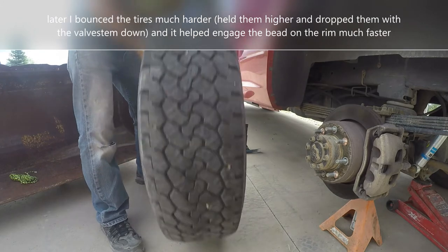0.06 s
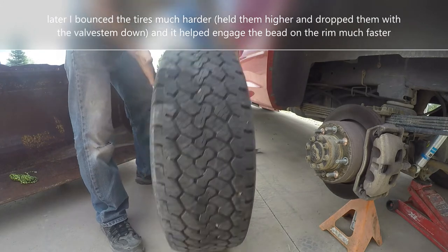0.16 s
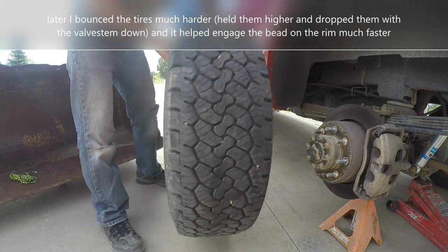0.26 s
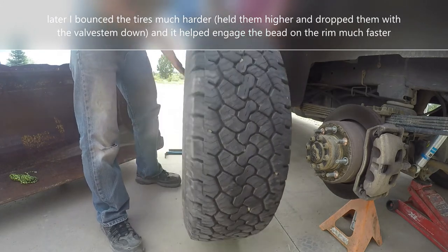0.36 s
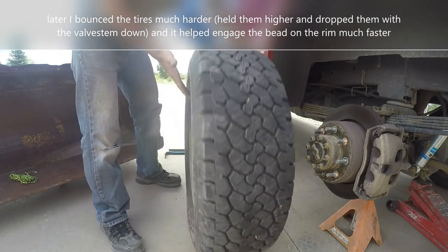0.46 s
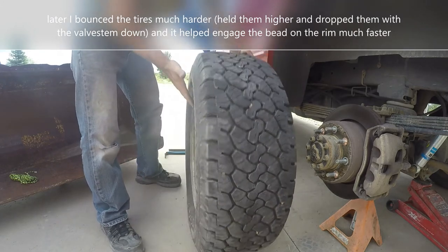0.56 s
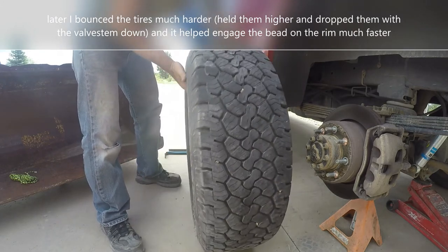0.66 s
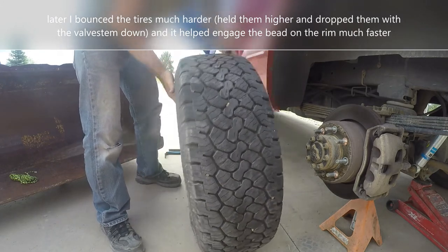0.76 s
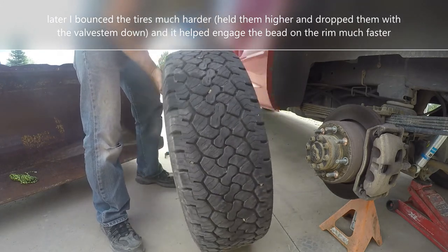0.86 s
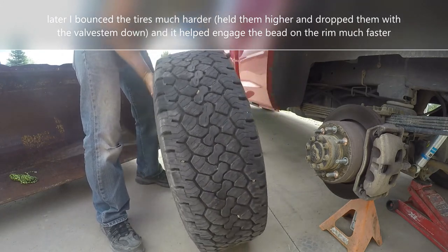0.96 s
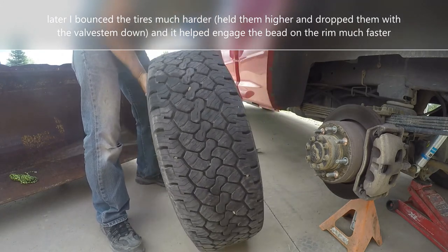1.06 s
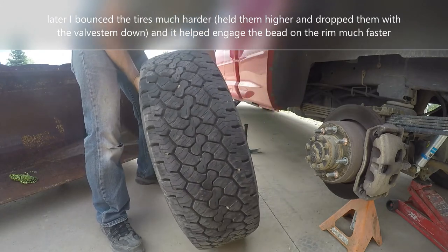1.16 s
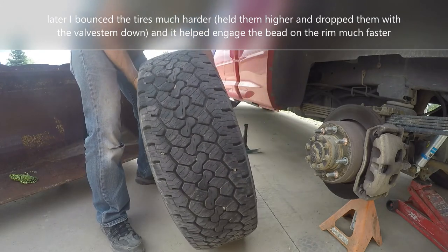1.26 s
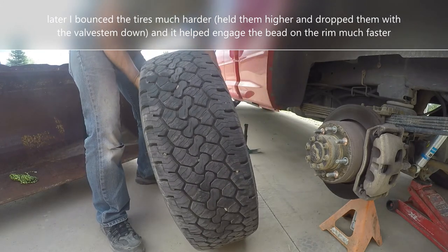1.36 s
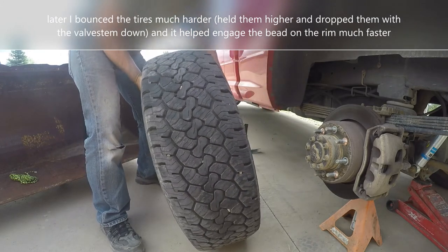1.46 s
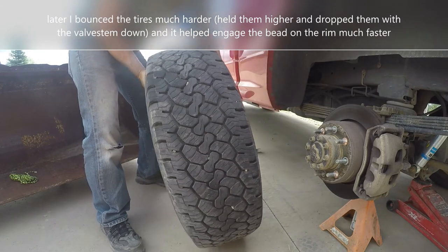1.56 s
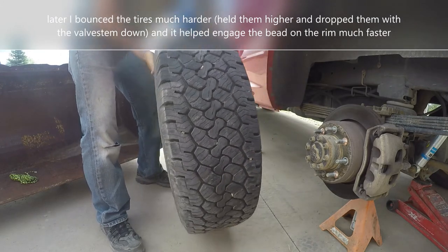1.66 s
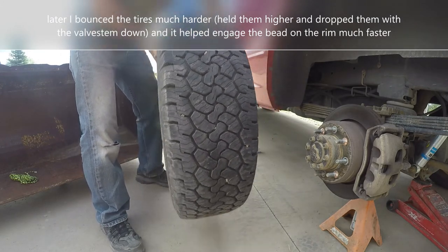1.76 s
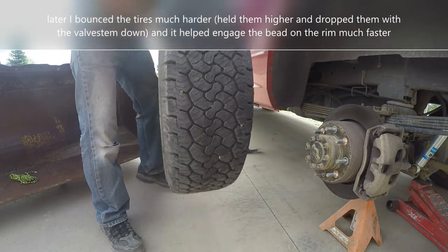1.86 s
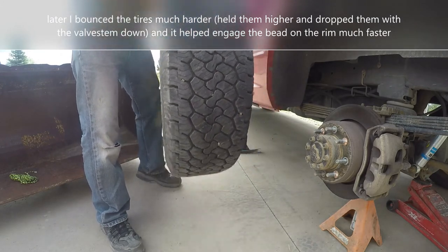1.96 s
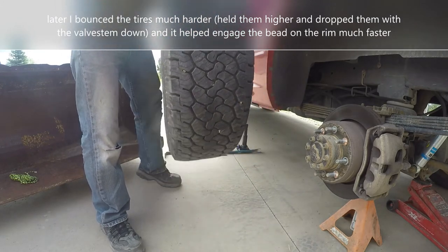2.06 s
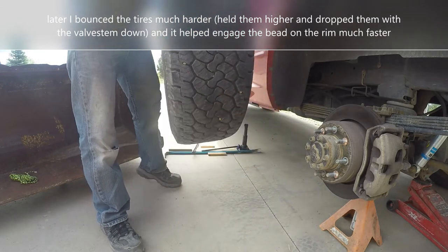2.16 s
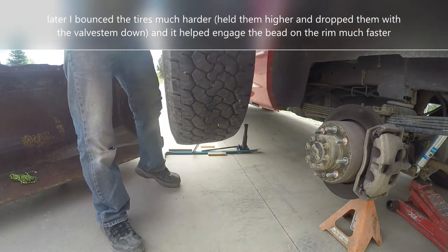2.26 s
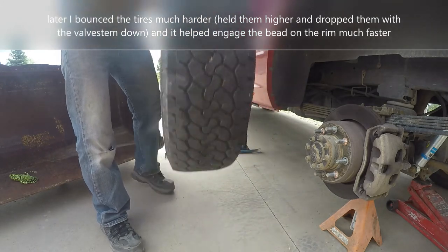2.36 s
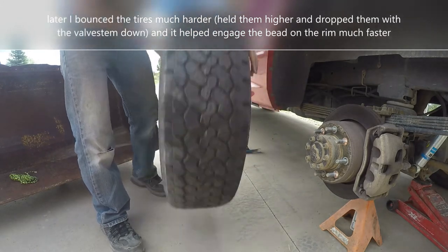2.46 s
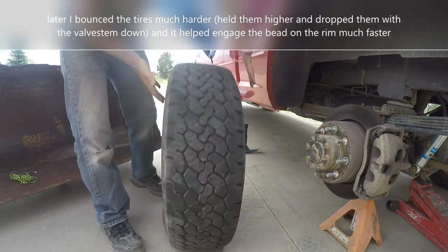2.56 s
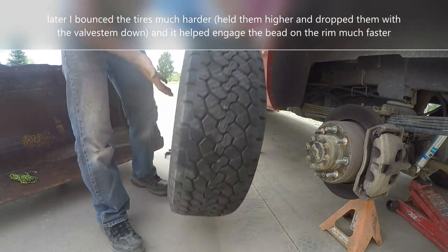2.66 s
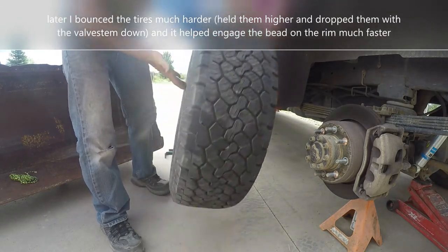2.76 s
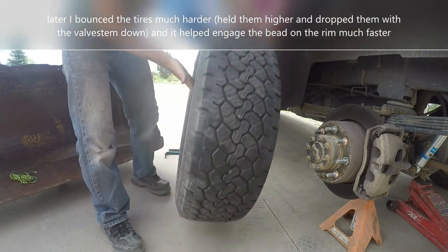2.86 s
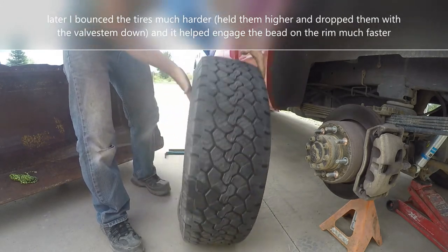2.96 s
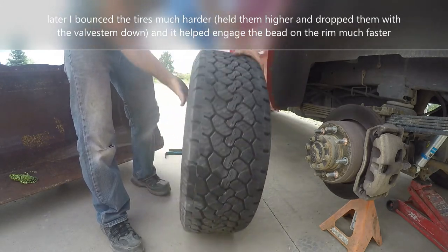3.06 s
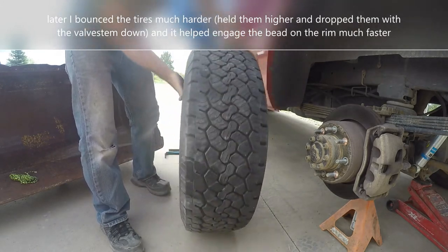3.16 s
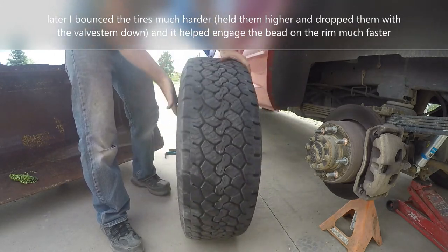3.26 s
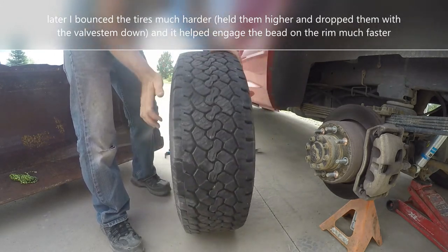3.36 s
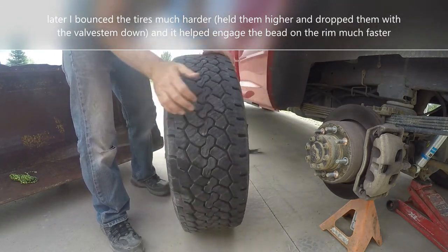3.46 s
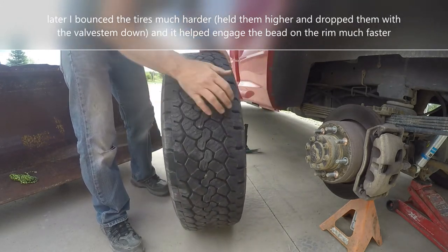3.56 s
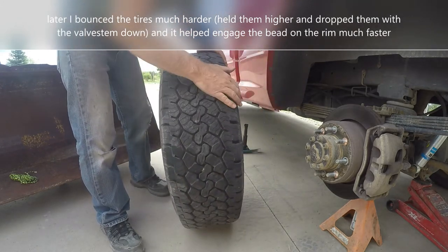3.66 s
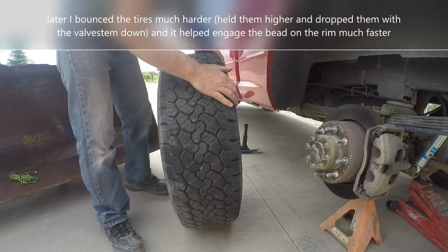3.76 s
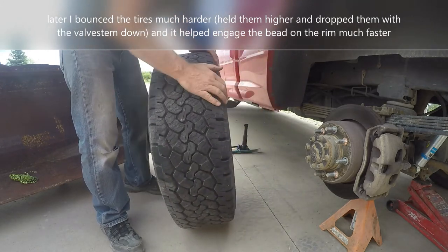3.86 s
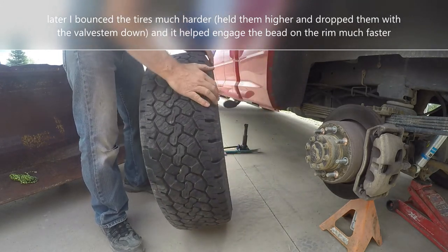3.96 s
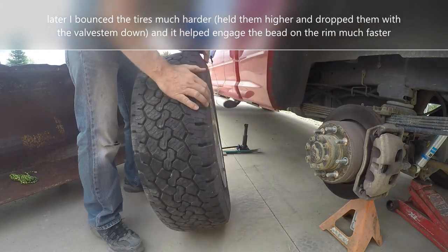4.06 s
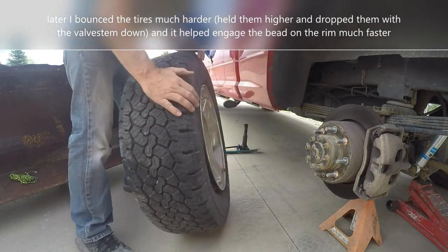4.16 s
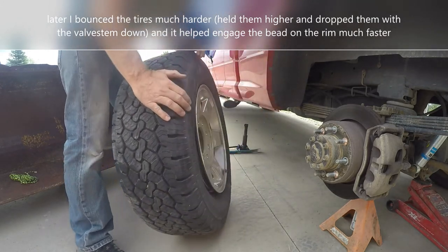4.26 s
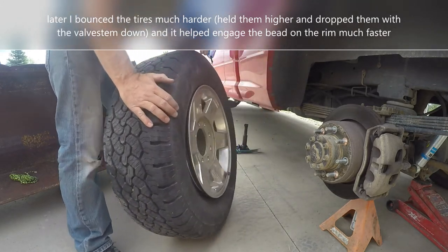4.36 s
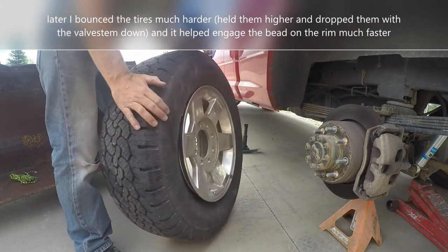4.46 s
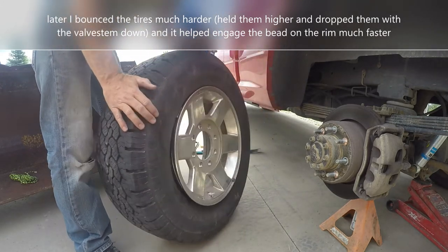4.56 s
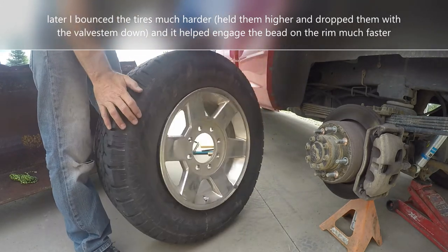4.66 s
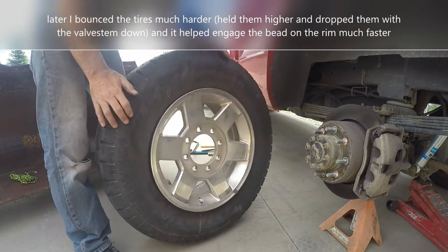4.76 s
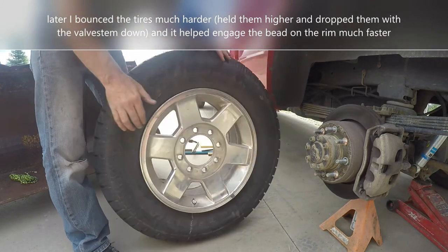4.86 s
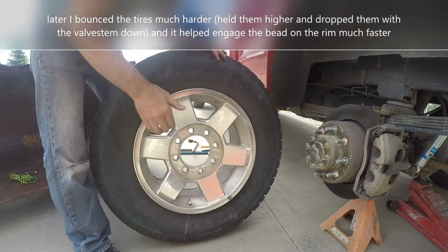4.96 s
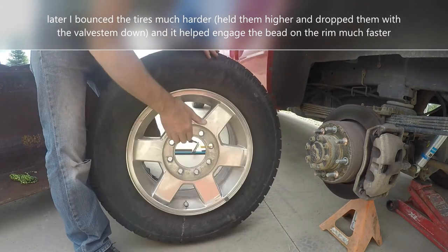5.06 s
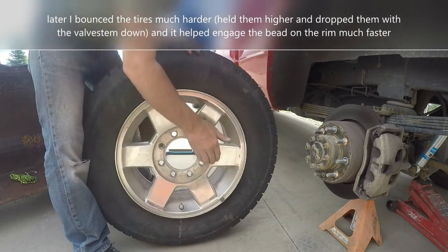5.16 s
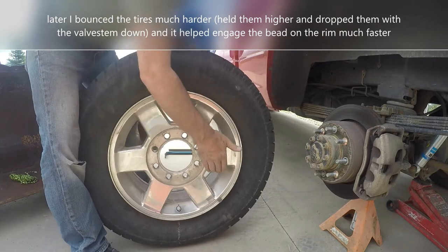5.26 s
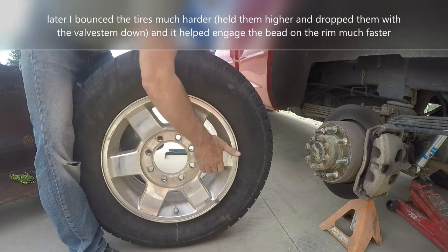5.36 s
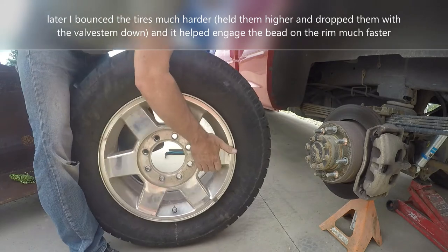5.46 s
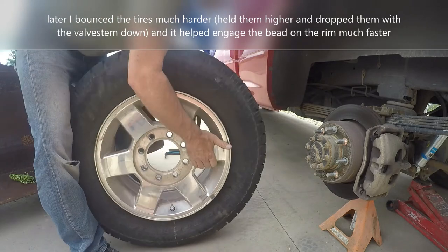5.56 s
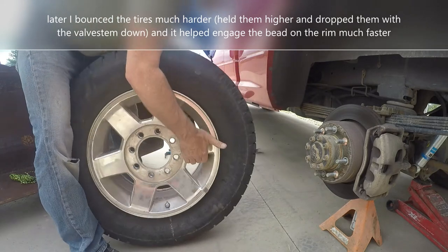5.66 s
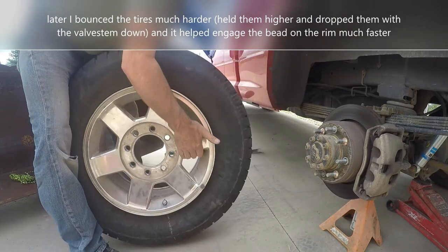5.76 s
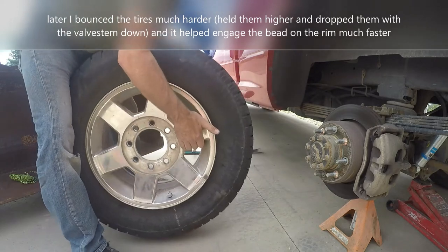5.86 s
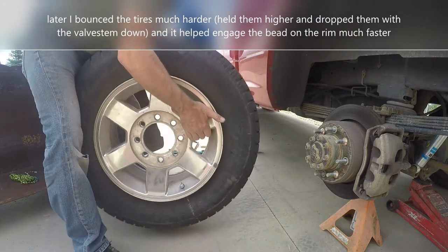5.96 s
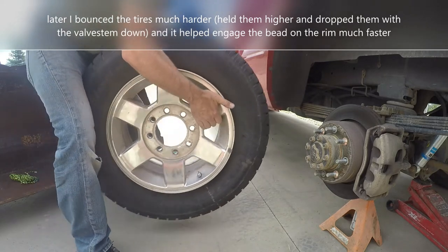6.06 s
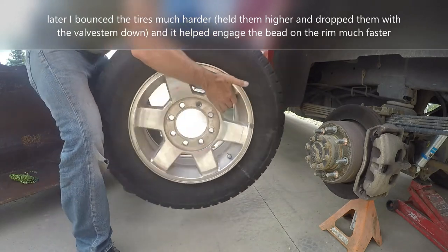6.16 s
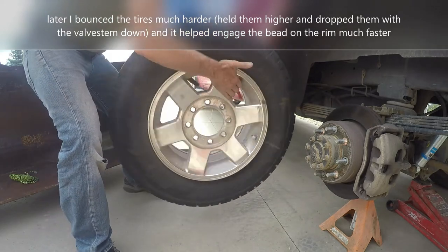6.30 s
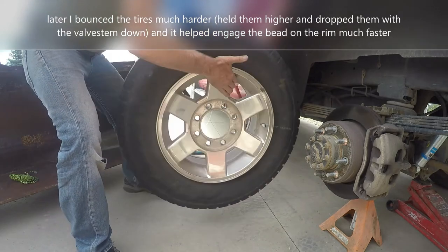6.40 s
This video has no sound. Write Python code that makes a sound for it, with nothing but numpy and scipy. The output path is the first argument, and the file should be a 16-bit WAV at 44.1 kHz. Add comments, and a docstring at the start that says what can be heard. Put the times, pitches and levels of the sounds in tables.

```python
"""A truck tire on an alloy wheel is dropped twice on a concrete shop floor and bounces out each time.
Each landing slaps the tread, rings the carcass and its air, and shoves out a slow thump; the tread
scrubs and lifts off again. Hands brush and pat the rubber, and the wheel is turned on the gritty floor.
The shop echoes over a faint rumble and whine. A close microphone overloads on the hardest slaps."""
import sys
import numpy as np
from scipy import signal
from scipy.fft import rfft, irfft
from scipy.io import wavfile

SR = 44100
rng = np.random.default_rng(int(sys.argv[2]) if len(sys.argv) > 2 else 0)


def materialize(psi):
    """Save the field psi as 16-bit PCM at rate SR to the path in sys.argv[1].

    A 1-D psi becomes a single channel; in a 2-D psi each row is a channel.
    """
    bounded = np.clip(np.atleast_2d(psi).T, -1, 1)
    quanta = np.round(bounded * 32767).astype(np.int16)
    wavfile.write(sys.argv[1], SR, quanta)


N = 283544
TIME = np.arange(N) / SR
RING = TIME[:SR]  # one second for a blow to ring out
BRIGHTNESS_POWER = 0.4  # a harder slap is shorter: its cutoff follows its strength to this power

# The tire's bounces. Each row: start in seconds; slap, crack, carcass and thump levels in dB;
# thump pitch in Hz; thump delay in seconds; lift-off in dB against the landing, before each layer's trim.
BOUNCES = [(0.1106, -13, -27, -11.5, -8, 26.3, 0.033, -9),
           (0.4945, -10, -19, -19, -19.5, 27.8, 0.023, -11.5),
           (.7300, -32.5, -53, -28, -32, 76.6, 0.03, -14),
           (0.901, -58, -82, -42.5, -38.5, 85.4, 0.021, -22), (2.5528, -8.5, -16, -13, -10, 47, 0.021, -12),
           (2.9743, -23, -44.5, -21, -12, 46.2, .0485, -10),
           (3.2373, -20, -29, -26.5, -26, 49.6, 0.039, -22.5),
           (3.4040, -45.5, -80, -38, -35.5, 83.5, .024, -19.5)]
# Tread blocks scrubbing on concrete. Each row: frequency in Hz, gain in dB.
SCRUB_SPECTRUM = [(300, -10), (900, 0), (1700, -3), (2600, -1), (3800, -2), (5500, -7), (6600, -21),
                  (9000, -28), (14000, -38)]


def undb(db):
    """Decibels to gain."""
    return 10 ** (np.asarray(db) / 20)


def level(x, db):
    """Set the rms of a steady sound."""
    return x * undb(db) / np.std(x)


def burst(x, db):
    """Set the energy of a short sound, as its rms over 30 ms."""
    return x * undb(db) / np.sqrt(np.sum(x ** 2) / (.03 * SR))


def add(out, s, x):
    """Mix a short sound in at time s."""
    i = max(int(s * SR), 0)
    out[i:i + len(x)] += x[:N - i]


def colour(x, points):
    """Minimum-phase EQ through the given (Hz, dB) points."""
    size = 8192
    hz, db = np.transpose(points)
    bin_hz = np.arange(size // 2 + 1) * SR / size
    gain = undb(np.interp(np.log(bin_hz + 1), np.log(hz), db))
    cepstrum = irfft(np.log(gain))[:size // 2]
    cepstrum[1:] *= 2
    response = irfft(np.exp(rfft(cepstrum, size)))
    return signal.fftconvolve(x, response)[:len(x)]


def soften(x, hz):
    """A softer contact pushes for longer and loses the treble."""
    return signal.sosfilt(signal.butter(2, min(hz, SR / 3), fs=SR, output="sos"), x)


def noise(points, count=N):
    """Coloured noise of unit rms."""
    return level(colour(rng.standard_normal(count), points), 0)


def gravelly(points, grain_db=3, count=N):
    """Dense tiny clicks of uneven size, none standing out alone; coloured, with unit rms."""
    size = np.minimum(rng.exponential(size=count), 5)
    clicks = rng.standard_normal(count) * undb(grain_db * size)
    return level(colour(clicks, points), 0)


def attack(rise_s):
    """Envelope that rises from silence and holds."""
    return 1 - np.exp(-RING / rise_s)


def fade(t60):
    """Decay that falls 60 dB in t60 seconds."""
    return np.exp(-np.log(1000) * RING / t60)


def swell(rise_s):
    """Envelope that peaks after rise_s and dies away."""
    return (RING / rise_s * np.exp(1 - RING / rise_s)) ** 2


def bump(s, half_s, time=TIME):
    """Smooth rise and fall around time s."""
    return np.exp(-((time - s) / half_s) ** 2 / 2)


def drift(rate_hz):
    """Random wander with a spread near 1."""
    knots = rng.standard_normal(int(N / SR * rate_hz) + 2)
    return np.interp(TIME * rate_hz, np.arange(len(knots)), knots)


def struck(modes, scatter_db=0.47, detune=0.0068):
    """Each blow meets another spot under another load, so the modes vary in strength, pitch and phase."""
    out = np.zeros(SR)
    for hz, db, t60 in modes:
        strength, pitch, phase = rng.standard_normal(3)
        turns = hz * (1 + detune * pitch) * RING + phase
        out += undb(db + scatter_db * strength) * fade(t60) * np.sin(2 * np.pi * turns)
    return out * attack(0.0013)


def background(whine_hz=10286, pulse_hz=24.4):
    """Low rumble, steady air noise and a thin, pulsing electronic whine."""
    # The room tone's air and rumble. Each row: frequency in Hz, gain in dB.
    air_spectrum = [(41, -26.5), (70, 2), (103, -13), (144, -16.5), (188, -9), (258, -18), (288, -22),
                    (361, -12.5), (403, -19.5), (676, -9), (723, -14), (1110, -27), (2910, -30),
                    (4080, -30), (15000, -45)]
    rumble_spectrum = [(15, -21.5), (28, -7), (38, -21), (49, -6), (58, -7), (75, -22), (130, -22),
                       (400, -89.5)]
    air = level(noise(air_spectrum), db=-55.5) * undb(drift(8) / 4)
    rumble = level(noise(rumble_spectrum), db=-48)
    whine = np.sin(2 * np.pi * whine_hz * TIME) * (1 + np.sin(2 * np.pi * pulse_hz * TIME))
    return air + rumble + level(whine * undb(2 * drift(40)), db=-83)


def reflections(points, t60, build_s, db):
    """A dense train of echoes that builds up and decays."""
    tail = noise(points, count=SR) * fade(t60) * attack(build_s)
    return undb(db) * tail / np.sqrt(np.sum(tail ** 2))


def shop(x, modes_db=-19):
    """Add the wash of the shop, its duller late echo and its standing waves."""
    # Tone of the far walls' wash and of the late echo. Each row: frequency in Hz, gain in dB.
    far_spectrum = [(60, -8), (200, 2), (700, -15), (1400, -8.5), (2200, -6.5), (4000, 7), (7000, -9),
                    (15000, -29.5)]
    late_spectrum = [(100, -9), (300, -4), (700, -5.5), (1350, -5.5), (2000, -13), (4000, -19),
                     (10000, -39)]
    # Standing waves. Each row: frequency in Hz, relative level in dB, ring time in seconds.
    room_modes = [(161, -67, 1.3), (184.9, -67, .9), (397, -66, 1.9), (368, -60, 1.6)]
    far = reflections(far_spectrum, t60=0.34, build_s=0.021, db=-20)
    late = reflections(late_spectrum, t60=0.69, build_s=.03, db=-34)
    standing = sum(undb(db) * fade(t60) * np.sin(2 * np.pi * hz * RING) for hz, db, t60 in room_modes)
    return x + signal.fftconvolve(x, far + late + undb(modes_db) * standing)[:N]


def nearby(x, db=-8):
    """Add quick echoes off the floor and underbody, different for every hit."""
    # Tone of the early reflections. Each row: frequency in Hz, gain in dB.
    near_spectrum = [(60, -21.5), (200, -6.5), (450, -0.5), (700, 0), (1400, 3), (2200, -1), (4000, -7.5),
                     (8000, 6), (15000, -3.5)]
    echoes = reflections(near_spectrum, t60=0.14, build_s=0.00076, db=db)
    return x + signal.fftconvolve(x, echoes)[:len(x)]


def turning(uneven_db=2.0):
    """Rubber grinds fine grit against the concrete, swelling with each shove that pivots the wheel."""
    # Shoves. Each row: middle in seconds, half length in seconds, level in dB.
    shoves = [(4.513, 0.03, -51.5), (4.728, 0.21, -54), (5.333, 0.044, -57.5), (5.61, 0.11, -58.5),
              (6.036, 0.13, -57.5), (6.42, 0.037, -60)]
    # Grinding grit. Each row: frequency in Hz, gain in dB.
    grit_spectrum = [(100, -3), (300, 8), (700, 1.5), (1200, 3), (1800, -7), (2600, -1), (3100, -5),
                     (3750, -1.5), (5000, -14.5), (7000, -23), (14000, -30)]
    pressure = np.sqrt(sum((undb(db) * bump(s, half_s)) ** 2 for s, half_s, db in shoves))
    return gravelly(grit_spectrum, grain_db=4) * pressure * undb(uneven_db * drift(30))


def hands(uneven_db=2.5):
    """Palms pat the tread and drag over it, which sounds the hollow body under a dry, grainy hiss."""
    # Pats. Each row: start in seconds, level in dB, low-pass cutoff in Hz.
    pats = [(2.128, -55.5, 890), (2.412, -46.5, 3470), (2.452, -41.5, 1500), (2.711, -52, 1000),
            (3.427, -49.5, 5000), (3.690, -52.5, 675), (4.273, -36.5, 988), (4.312, -38.5, 1630),
            (4.336, -43.5, 486), (5.351, -41.5, 2800), (5.507, -53, 1195), (5.628, -53.5, 1200),
            (6.076, -44.5, 2800)]
    # Rubber under a cupped palm. Each row: frequency in Hz, relative level in dB, ring time in seconds.
    palm_modes = [(171, -7.5, .07), (302, -7, 0.035), (456, -2, 0.033), (623, 2.5, 0.04),
                  (748, -6.5, 0.037), (1333, -9, 0.011), (2460, 1, 0.0058)]
    # Slides. Each row: middle in seconds, half length in seconds, body level in dB, hiss level in dB.
    slides = [(1.797, 0.077, -67, -66), (2.427, 0.014, -43.5, -52), (3.431, .012, -53, -55.5),
              (3.765, 0.052, -46.5, -57), (4.055, 0.023, -49.5, -55), (5.357, 0.015, -48, -64),
              (5.539, 0.013, -47, -62), (5.663, 0.071, -48.5, -63), (6.082, 0.075, -51.5, -69)]
    # The tire's hollow body and the hiss of skin. Each row: frequency in Hz, gain in dB.
    body_spectrum = [(60, -12.5), (180, -8), (300, -8), (480, -6.5), (620, 1), (760, -9), (1000, -20),
                     (1800, -33.5), (5000, -54)]
    skin_spectrum = [(300, -27), (900, 6.5), (1700, -7), (2600, -2), (3800, -0.5), (5600, -8), (7000, -20),
                     (9000, -20), (14000, -28.5)]
    out = np.zeros(N)
    for s, db, cutoff_hz in pats:
        pat = soften(struck(palm_modes), cutoff_hz)
        add(out, s, burst(nearby(pat, db=-10), db))
    body = noise(body_spectrum)
    hiss = gravelly(skin_spectrum, grain_db=3.5)
    grip = undb(uneven_db * drift(82))
    for s, half_s, body_db, hiss_db in slides:
        out += bump(s, half_s) * grip * (undb(body_db) * body + undb(hiss_db) * hiss)
    return out


def groove_jet(thump_db):
    """At the deepest squash air jets out of the grooves, gaining 1.5 dB for each dB of thump."""
    # Groove hiss. Each row: frequency in Hz, gain in dB.
    jet_spectrum = [(500, -18.5), (2000, 3.5), (3800, 7), (5600, -3), (6800, -9), (8000, 1), (11000, -9.5),
                    (15000, -13.5)]
    hiss = noise(jet_spectrum, count=SR) * bump(s=.038, half_s=.013, time=RING)
    return burst(hiss, -44.5 + 1.5 * thump_db)


def scrub(thump_db, rise_s, base_db):
    """The tread blocks squirm on the concrete, louder with a deeper squash."""
    friction = gravelly(SCRUB_SPECTRUM, count=SR) * np.sqrt(swell(rise_s))
    return burst(friction, base_db + 0.92 * thump_db)


def thump(hz, delay_s, cycles=0.58):
    """The sidewalls bulge and recoil, shoving out a cycle or two of air around the deepest squash."""
    turns = (RING - delay_s) * hz
    return np.exp(-(turns / cycles) ** 2 / 2) * np.sin(2 * np.pi * turns) * attack(0.0062)


def carcass_blow():
    """The carcass rings in a few clear modes over the dense flapping of the sidewalls."""
    # The carcass and the air in it. Each row: frequency in Hz, relative level in dB, ring time in seconds.
    carcass_modes = [(79.3, -7, 0.35), (99, -8, 0.24), (115, -2, 0.075), (152.2, -6, 0.17),
                     (171.9, -12, 0.43), (198, -3.5, 0.16), (223, 2, 0.031), (262, -8, 0.1),
                     (342.3, -3, 0.096), (421.6, -4, 0.097)]
    # Sidewall flap. Each row: frequency in Hz, gain in dB.
    flap_spectrum = [(40, -18), (80, -1.5), (115, 4.5), (150, 6), (205, 6.5), (270, -2), (335, 4),
                     (450, -4), (800, -56)]
    flap = noise(flap_spectrum, count=SR) * fade(t60=0.16) * attack(0.00048)
    return burst(soften(struck(carcass_modes), hz=600), db=0) + burst(flap, db=-3)


def block_crack(slap_db):
    """The tread blocks crack against the floor, with more top on a harder slap."""
    # The hard crack. Each row: frequency in Hz, gain in dB.
    crack_spectrum = [(300, -22), (1100, 9), (1400, 12), (1700, 2.5), (2100, 4), (2700, 1.5), (3400, -16.5),
                      (4300, -13.5), (5400, -12.5), (9000, -44)]
    crack = colour(signal.unit_impulse(SR), crack_spectrum)
    top_hz = 6400 * undb(slap_db) ** .16
    return soften(soften(crack, top_hz), top_hz)


def tread_blow(echo_s=0.005577, echo_db=-6):
    """A short clap of air, its return off the truck's side, and the ring of the tread."""
    # Air squeezed from under the tread. Each row: frequency in Hz, gain in dB.
    clap_spectrum = [(100, -17.5), (320, -6.5), (440, -10.5), (550, 7), (750, 5.5), (900, -1), (1100, 2.5),
                     (1350, -4), (1650, -15.5), (2600, -19), (5000, -47.5), (12000, -66.5)]
    # The tread band. Each row: frequency in Hz, relative level in dB, ring time in seconds.
    tread_modes = [(487.6, -13.5, 0.12), (544, -10, 0.062), (560, -0.5, 0.052), (660, -3.5, 0.12),
                   (749, -1.5, 0.052), (795, -12, 0.089), (1007, -8.5, 0.098), (1108, -8, 0.036),
                   (1160, -10, 0.02), (1150, -5.5, 0.027), (1354, -14.5, 0.056)]
    push = signal.unit_impulse(SR)
    push[int(echo_s * SR)] = undb(echo_db)
    return burst(colour(push, clap_spectrum), db=0) + burst(struck(tread_modes), db=-3)


def liftoffs(contact_s=.0735, peel_s=0.0048):
    """The blocks let go one by one and the carcass snaps back to round: soft tread, full bass."""
    out = np.zeros(N)
    for landing_s, slap_db, _, carcass_db, thump_db, _, _, lift_db in BOUNCES:
        s = landing_s + contact_s  # the tire is a spring, so every bounce stays down equally long
        peel_db = slap_db + lift_db - 4
        cutoff_hz = 2475 * undb(peel_db) ** BRIGHTNESS_POWER
        peel = signal.fftconvolve(tread_blow(), rng.standard_normal(SR) * swell(peel_s))[:SR]
        add(out, s - peel_s, scrub(thump_db + lift_db, rise_s=0.0073, base_db=-31))
        add(out, s - peel_s, burst(nearby(soften(peel, cutoff_hz)), peel_db))
        add(out, s, burst(carcass_blow(), carcass_db + lift_db - 1.5))
        add(out, s, burst(thump(hz=40, delay_s=0.0086), thump_db + lift_db + 1.5))
    return out


def landings():
    """Slap, crack, ring, thump, scrub and hiss each time the tire meets the floor; harder is brighter."""
    out = np.zeros(N)
    for s, slap_db, crack_db, carcass_db, thump_db, thump_hz, delay_s, _ in BOUNCES:
        cutoff_hz = 3000 * undb(slap_db) ** BRIGHTNESS_POWER
        add(out, s, burst(nearby(soften(tread_blow(), cutoff_hz)), slap_db))
        add(out, s, burst(nearby(block_crack(slap_db), db=-11), crack_db))
        add(out, s, burst(carcass_blow(), carcass_db))
        add(out, s, burst(thump(thump_hz, delay_s), thump_db))
        add(out, s, scrub(thump_db, rise_s=0.018, base_db=-31.5))
        add(out, s, groove_jet(thump_db))
    return out


def scene():
    """The bouncing and handling of the tire echo in the shop, over its room tone, in mono."""
    tire = landings() + liftoffs() + hands() + turning()
    return (shop(tire) + background())[None]


def record(dry, top_hz=15200):
    """The microphone flattens the hardest peaks; the top is cut."""
    flattened = .96 * dry / (1 + dry ** 20) ** (1 / 20)
    return signal.sosfilt(signal.ellip(8, .2, 70, top_hz, fs=SR, output="sos"), flattened)


dry = scene()
out = record(dry)
materialize(out)
```